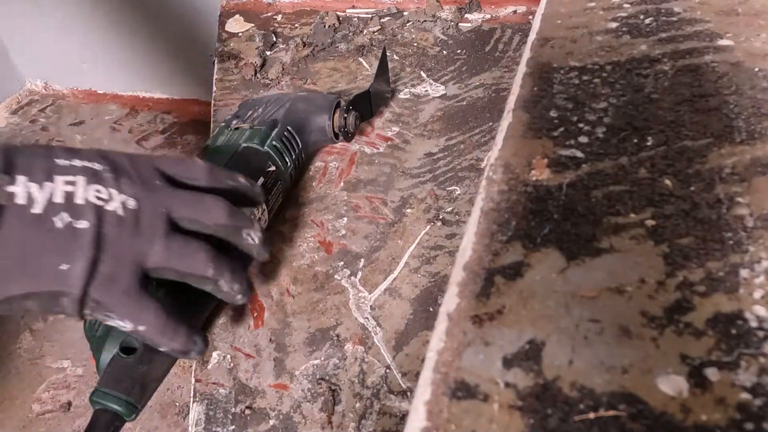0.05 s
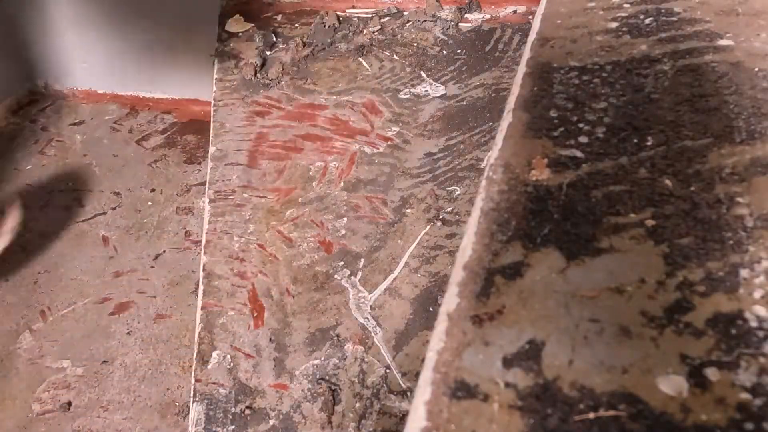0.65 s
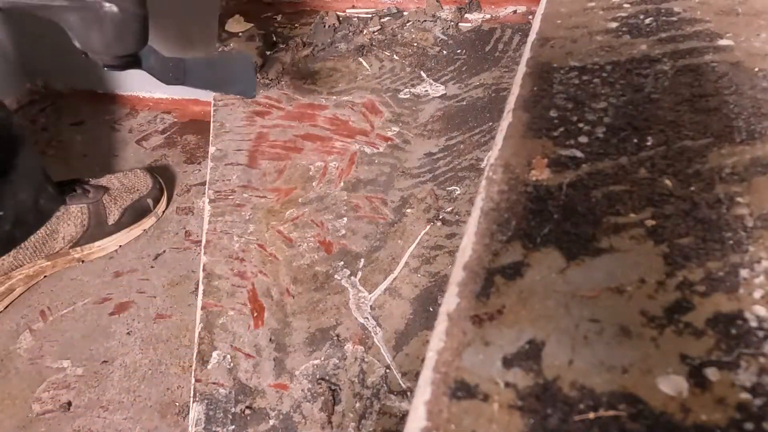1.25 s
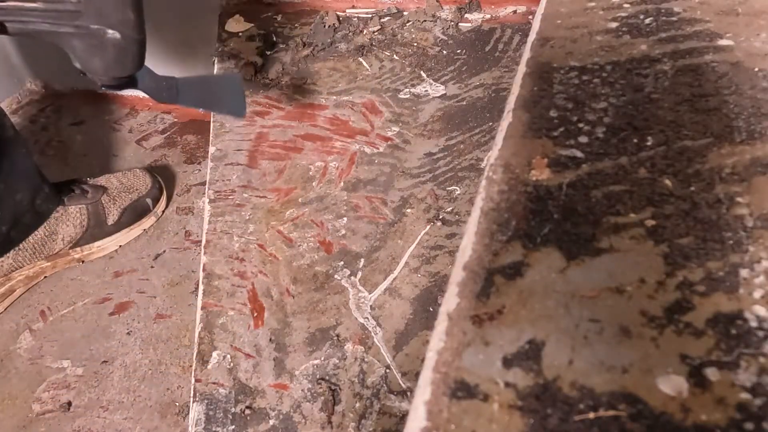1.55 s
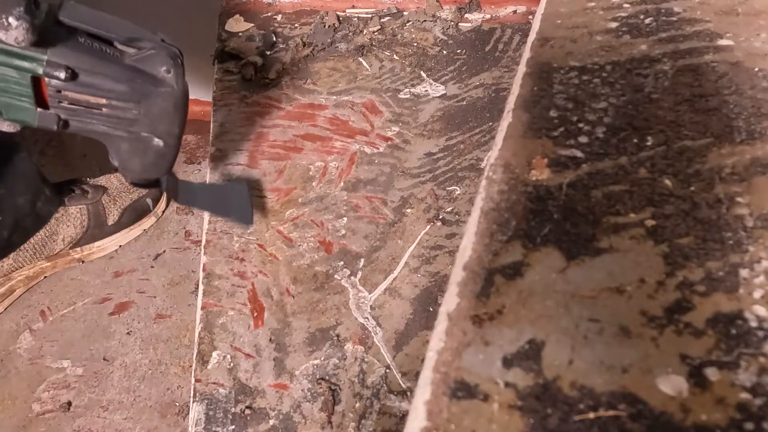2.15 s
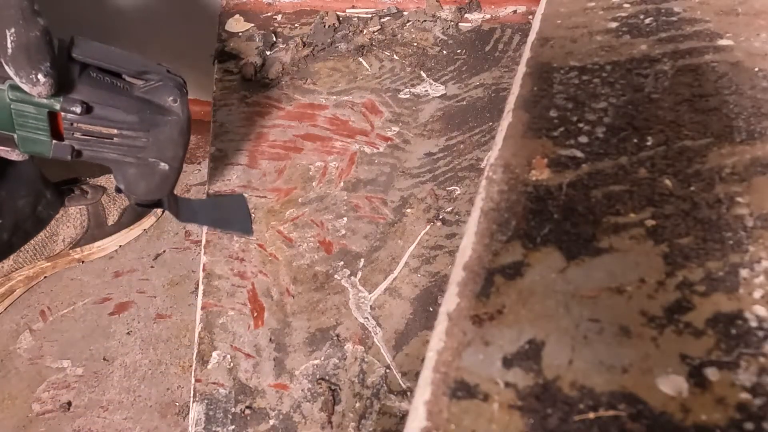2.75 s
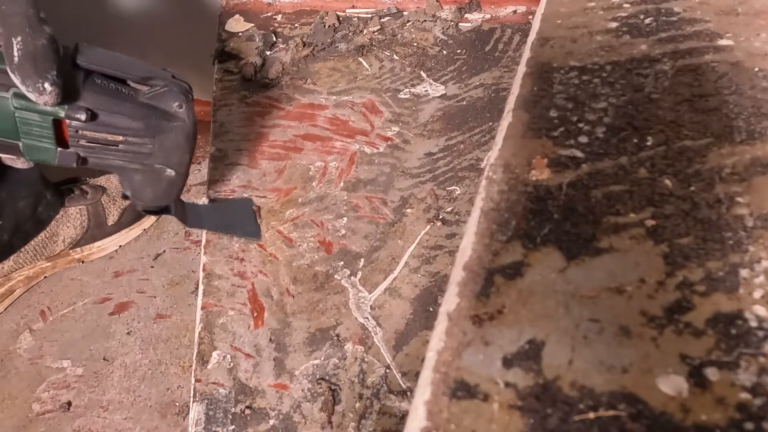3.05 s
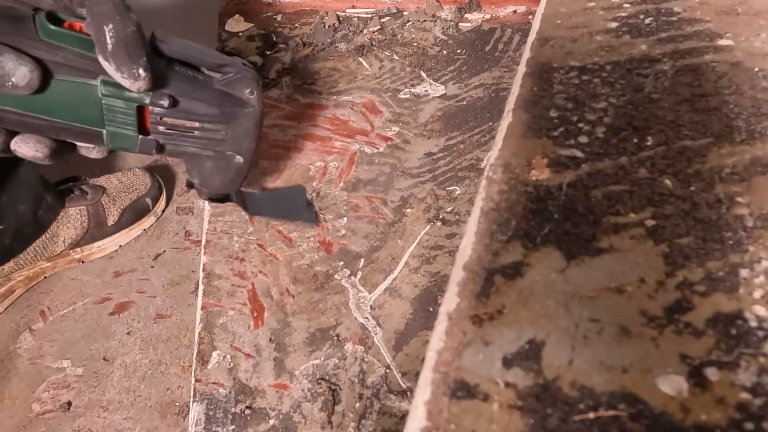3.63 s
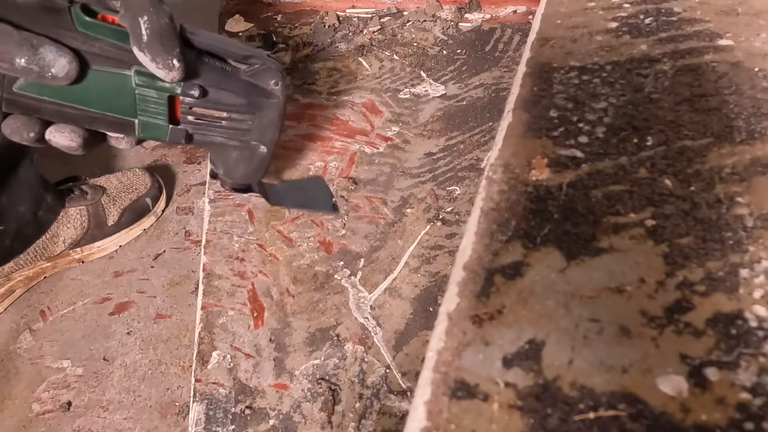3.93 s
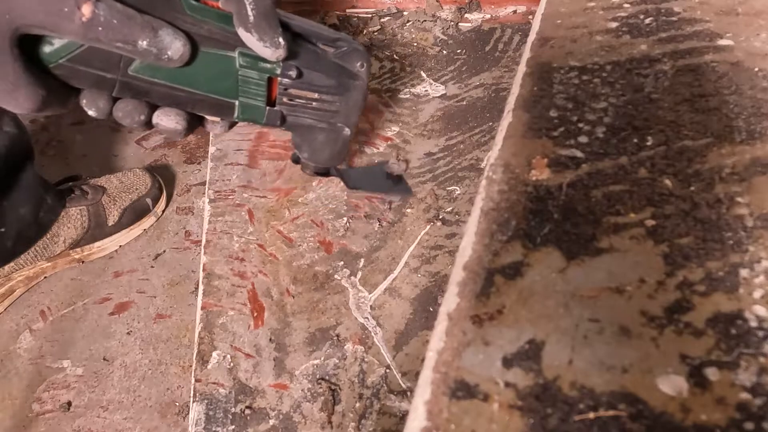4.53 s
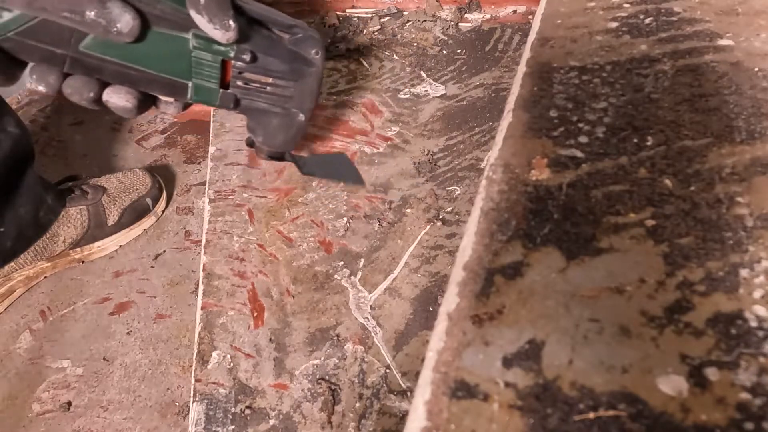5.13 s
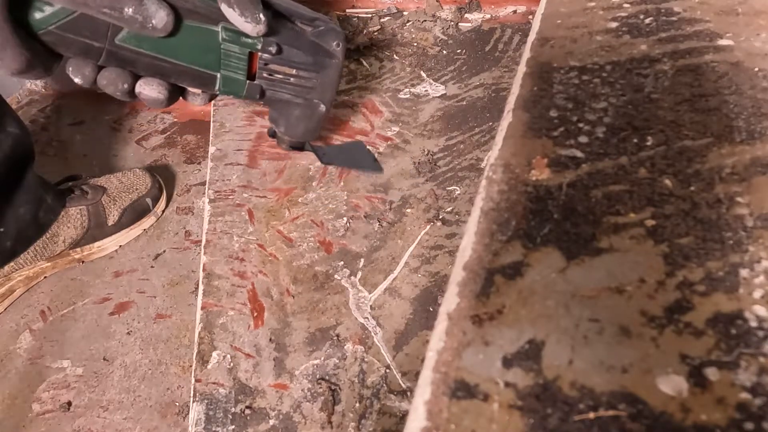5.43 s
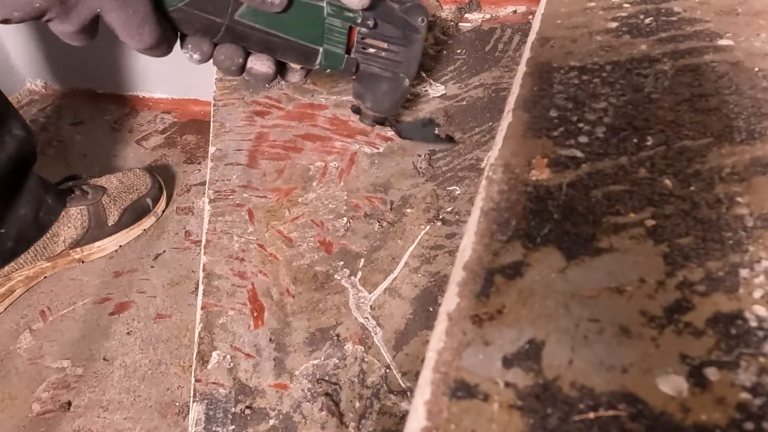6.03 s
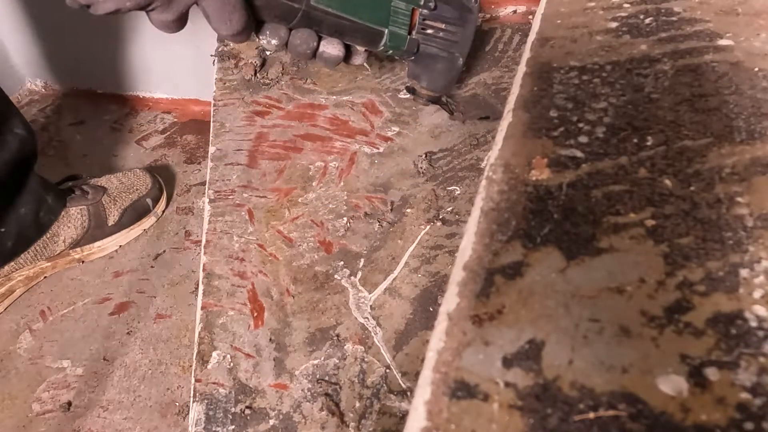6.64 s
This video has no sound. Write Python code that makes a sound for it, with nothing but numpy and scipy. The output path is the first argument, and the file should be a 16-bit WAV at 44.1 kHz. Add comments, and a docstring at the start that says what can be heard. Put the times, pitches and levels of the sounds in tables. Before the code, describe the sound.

An oscillating power tool is picked up from a concrete step with soft bumps, a glove rub and a hard, briefly ringing clack at about 0.4 seconds. Around 0.7 to 1.3 seconds a shoe shuffles with dull thuds and dry scuffs. At 1.5 seconds the switch clicks and the motor spins up, rattling loosely as it rises, then settling by about 2.5 seconds into a steady hum with a bright buzz, rushing air and a thin high whine. From about 3 seconds the blade pushes under old glue, adding a grainy rasp as the pitch dips. Brief gritty screeches come between 3.5 and 4.6 seconds. The pitch recovers around 5 seconds, then sags again, with more screeches near 5.5 and 5.9 seconds. It is lowest at the end, near 7 seconds, still running. The tool sounds close, with a short echo from hard stairwell walls.

```python
"""Scraping glue in a stairwell

An oscillating multitool is picked up from a concrete step in a hard-walled stairwell; a shoe shuffles.
The switch clicks, the motor spins up with a thin whine, and the blade is pushed under old glue,
slowing as it bites. Each swing of the blade shakes the housing (hum), rattles the drive and blade
(buzz) and rubs over grit (rasp). The walls echo."""
import sys
import numpy as np
from scipy import signal
from scipy.fft import rfft, irfft, next_fast_len
from scipy.io import wavfile

SR = 44100
rng = np.random.default_rng(int(sys.argv[2]) if len(sys.argv) > 2 else 0)


def to_wav(s):
    """Save 16-bit WAV."""
    ch = np.atleast_2d(s).T  # columns
    pcm = np.round(np.clip(ch, -1, 1) * 32767)  # PCM
    wavfile.write(sys.argv[1], SR, pcm.astype(np.int16))


N = 303408

# Table levels are relative. A "colour" says how strong each frequency is.
# colour of the still air (f/Hz, level/dB)
AIR = [(25, 12.5), (100, -11), (250, -5), (1000, -14), (4000, -20), (14000, -35)]
# knocks of hand, tool, shoe and switch (t/s, level/dB, thud dull above f/Hz, hardness/0-1)
KNOCKS = [(0.07, -42, 1110, 0.01), (0.097, -49, 980, 0.06), (0.274, -53, 4000, 0.1),
          (0.4428, -30, 4960, 0.61), (0.865, -42, 1070, 0.08), (0.928, -46, 990, 0.15),
          (1.015, -35.5, 3440, 0.12), (1.115, -40.5, 280, 0), (1.485, -35.5, 11060, 0.45)]
# colours of a soft thud and a hard clack (f/Hz, level/dB)
THUD = [(60, -8), (250, 4), (600, 9), (1000, 5), (1600, 1), (4000, 2.5), (7000, 9), (14000, -15)]
CLACK = [(100, -22), (280, -19), (430, 21), (800, -27), (1100, 11), (1350, -19), (1750, 10.5), (2400, 9.5),
         (3100, 11), (3600, 9), (4500, 10), (5500, -3), (9000, -13.5), (14000, -51)]
# notes of the knocked tool (f/Hz, level/dB, ring time/s)
TOOL_MODES = [(427, 9, 0.44), (1080, 8, 0.24), (1770, -10, .15), (2180, -5, .3), (4118, -8, 0.2),
              (7350, -16, .2), (8150, -2, 0.6)]
# how long the echo takes to fade by 60 dB (f/Hz, time/s)
ECHO_TIMES = [(100, 0.53), (500, 0.72), (2000, 0.91), (5000, 0.48), (12000, 0.61)]
# glove and shoe drags (t/s, rise/s, fade/s, rumble level/dB, scuff level/dB)
DRAGS = [(0.09, 0.017, 0.099, -61.5, -73), (0.36, 0.05, 0.4, -66.5, -69), (0.69, 0.055, 0.069, -81, -70.5),
         (0.885, 0.01, 0.14, -55, -65), (1.01, 0.023, 0.07, -68, -52.5), (1.12, .012, 0.15, -53.5, -61),
         (1.22, 0.041, 0.19, -78, -57.5)]
# colours of a drag's low rumble and dry scuff (f/Hz, level/dB)
RUMBLE = [(12, -25), (20, 4.5), (49, -16.5), (214, -11), (247, -5.5), (279, -28), (350, -17), (460, -46),
          (770, -120)]
SCUFF = [(88, -52), (150, -18), (250, -22), (418, -8.5), (443, -22), (487, -13.5), (860, -14),
         (2690, -21.5), (12500, -44), (14000, -51)]
# notes of the switch's spring (f/Hz, level/dB, ring time/s)
SPRING_MODES = [(8700, -66, .2), (11280, -57, .14), (11750, -61, .1), (12500, -61, .11)]
# swings per second that the glue allows (t/s, f/Hz)
SPEED_LIMIT = [(2.56, 328.4), (2.8, 323.3), (2.88, 318.8), (3.16, 314.4), (3.34, 317.4), (3.5, 313.9),
               (4.2, 309.1), (4.32, 309.8), (4.74, 306.0), (5.02, 323.8), (5.32, 324.5), (5.52, 315.1),
               (6.0, 311.6), (6.2, 307.3), (6.68, 290.5), (6.88, 287.9)]
# colours of the motor's rush and the blade's rasp (f/Hz, level/dB)
RUSH = [(30, -33), (90, -17.5), (180, -7.5), (400, 1), (600, -2), (1000, 3), (1350, 1.5), (2000, 5.5),
        (2900, 0), (3700, 4), (5000, -7.5), (8000, -15.5), (14000, -27)]
RASP = [(1000, -3.5), (3000, -15), (4500, 8), (6000, 4.5), (7500, 3), (8500, -4), (11000, 0.5),
        (12700, -5.5), (14500, -29)]
# shaking of the tool body (t/s, then level/dB at 1, 2 and 3 times the swing rate)
HUM = [(2.0, -43, -58.5, -53), (2.46, -36.5, -47.5, -50), (2.6, -40.5, -45.5, -56), (2.82, -35, -48.5, -63),
       (2.88, -41.5, -45.5, -68), (3.06, -37, -47, -60.5), (4.14, -41.5, -49, -59.5), (4.68, -42, -59, -55),
       (5.0, -39, -50, -49.5), (5.26, -34.5, -47, -52), (5.46, -39.5, -51, -54.5), (5.9, -40.5, -63, -55),
       (6.18, -44.5, -64, -53), (6.42, -39, -53.5, -53), (6.88, -40.5, -51.5, -58)]
# colour of the high whine (f/Hz, level/dB)
WHINE = [(8000, -16), (10000, -9), (11000, -2), (11500, 0), (11850, -7), (12400, -6), (12900, -4),
         (13300, -8), (13700, -24)]
# colour of the drive's rattle (f/Hz, level/dB)
DRIVE = [(1250, -15), (1900, -20), (2200, -15), (2500, -14), (3200, -20), (3900, -18), (4500, -11),
         (5000, -13), (6200, -15.5), (7500, -21), (10000, -33), (13000, -40)]
# the housing's resonance, shifting with grip and load (t/s, level/dB, f/Hz)
HOUSING = [(2.0, -44.5, 1630), (2.36, -51.5, 1920), (2.7, -52.5, 1890), (3.4, -53.5, 1850),
           (3.98, -51, 1560), (4.2, -42.5, 1510), (4.45, -45.5, 1460), (4.82, -45.5, 1600),
           (5.0, -47, 2260), (5.2, -49, 2200), (5.4, -45, 1700), (5.76, -43.5, 1720), (6.02, -52, 1180),
           (6.26, -53, 2120), (6.6, -50, 2070), (6.88, -66, 1160)]
# level and centre pitch of the low, middle and high overtones of the blade's buzz (t/s, level/dB, f/Hz)
BLADE_LOW = [(1.6, -58, 1500), (1.9, -47.5, 2680), (2.14, -43.5, 3120), (2.44, -49.0, 3100),
             (3.1, -48.5, 3050), (3.22, -50.5, 2870), (3.64, -51.5, 3120), (4.36, -61.5, 2970),
             (4.48, -50.5, 3000), (4.72, -56.5, 2920), (4.9, -46.0, 3170), (5.08, -45.0, 3240),
             (5.2, -59.0, 3070), (5.92, -53.0, 3010), (5.98, -52.5, 2820), (6.86, -56.5, 2680)]
BLADE_MID = [(1.62, -54, 2150), (1.73, -44, 2630), (1.79, -46, 2740), (1.86, -40.5, 3030),
             (2.04, -51.5, 3620), (2.64, -46.5, 3640), (2.76, -55.0, 3640), (3.0, -43.0, 3530),
             (3.3, -48.5, 3580), (3.66, -43.0, 3550), (3.72, -43.0, 3700), (3.96, -42.0, 3630),
             (4.2, -50.5, 3660), (4.26, -44.5, 3740), (4.8, -44.5, 3410), (4.92, -48.0, 3780),
             (5.04, -43.5, 3890), (5.1, -45.5, 3650), (5.7, -43.0, 3660), (6.0, -47.0, 3490),
             (6.06, -42.0, 3550), (6.42, -46.5, 3440), (6.54, -43.0, 3530), (6.86, -48.0, 3440)]
BLADE_HIGH = [(1.6, -54, 2250), (1.69, -44, 2550), (1.76, -51, 3080), (1.94, -52.0, 3730),
              (2.06, -57.0, 4300), (2.6, -59.5, 4520), (2.78, -52.0, 4180), (2.9, -67.5, 4300),
              (3.44, -48.5, 4160), (3.98, -50.0, 4050), (4.04, -44.0, 4030), (4.4, -53.0, 4150),
              (4.76, -40.5, 3980), (4.94, -61.0, 4450), (5.24, -62.0, 4300), (5.48, -43.5, 4140),
              (5.84, -49.0, 4150), (6.02, -40.5, 4070), (6.32, -45.0, 3960), (6.86, -41.5, 3860)]
# the blade bites through to concrete (t/s, half length/s, screech level/dB, grit level/dB)
BITES = [(1.66, .025, -70, -57), (3.52, .03, -61, -49), (3.65, .04, -62, -54), (3.89, .05, -60, -56),
         (3.925, .015, -60, -44), (4.32, .025, -59, -49), (4.62, .04, -57.5, -51), (5.46, .06, -63, -60),
         (5.86, .09, -59, -50)]
# colour of a bite's screech (f/Hz, level/dB)
SCREECH = [(2500, -31), (4700, -23), (6100, -3.5), (7500, 0.5), (8500, -26), (11000, -6), (12500, -21)]
# how alike left and right sound (f/Hz, likeness/0-1)
LIKENESS = [(60, 0.57), (250, 1), (1000, 0.9), (4000, 0.87), (8000, 0.79), (12000, 0.72)]
# how much louder the left side is (f/Hz, level/dB)
LEAN = [(500, -0.5), (4000, .5), (8000, 1), (12000, 3)]

SWITCH_S, SNAP_S, SPIN_UP_S = 1.478, 1.498, 0.226   # power on, switch snap, spin-up time constant
FREE_HZ, TIGHT_HZ = 330, 280   # swing rates: running free, and where the drive stops being loose
RUSH_DB, RASP_DB, WHINE_DB, CLAMP_DB = -45, -54, -62.5, -43   # base levels


def from_db(db):
    """Turn decibels into a gain."""
    return 10 ** (np.asarray(db) / 20)


def rms_one(x):
    """Scale to an average power of 1."""
    return x / np.sqrt(np.mean(x ** 2) + 1e-20)


def in_time(rows):
    """Turn each column of a time table into a value for every sample."""
    s, *columns = np.transpose(rows)
    return [np.interp(np.arange(N) / SR, s, c) for c in columns]


def at_hz(points, hz):
    """Look up a frequency table, sliding between its rows on a pitch scale."""
    table_hz, values = np.transpose(points)
    return np.interp(np.log(hz), np.log(table_hz), values)


def drift(rate):
    """A random wobble of size about 1 that takes a new value rate times a second."""
    knots = rng.standard_normal(8000)
    return np.interp(np.arange(N) / SR * rate, np.arange(len(knots)), knots) * np.sqrt(3 / 2)


def stereo(mid, side, hz):
    """Left and right from a shared and an opposed part; the treble leans left."""
    alike, sign = at_hz(LIKENESS, hz), np.array([[1], [-1]])
    pair = np.sqrt((1 + alike) / 2) * mid + np.sqrt((1 - alike) / 2) * side * sign
    return pair * from_db(sign * at_hz(LEAN, hz) / 2)


def noise(colour, size=N):
    """Stereo noise of a given colour, with power 1."""
    length = next_fast_len(size)
    hz = np.maximum(np.fft.rfftfreq(length, 1 / SR), 1)
    mid, side = rfft(rng.standard_normal((2, length)))
    spectrum = stereo(mid, side, hz) * from_db(at_hz(colour, hz))
    return rms_one(irfft(spectrum, length)[:, :size])


def ring(clicks, hz, ring_s):
    """Each click starts a pure tone that fades by 60 dB in ring_s."""
    decay, step = from_db(-60 / (ring_s * SR)), 2 * np.pi * hz / SR
    return signal.lfilter([0, np.sin(step)], [1, -2 * decay * np.cos(step), decay ** 2], clicks + 1e-18)


def air(level_db=-80.5):
    """The stairwell's faint, low background noise."""
    return from_db(level_db) * noise(AIR)


def knocks(fade_s=0.0071, soft_s=0.0026, size=4000):
    """Soft contacts give a rounded thud, hard ones a clack that sets the tool ringing."""
    out, clicks = np.zeros((2, N)), np.zeros(N)
    t = np.arange(size) / SR
    fade, soft_rise = np.exp(-t / fade_s), 1 - np.exp(-t / soft_s)
    for s, db, dull_hz, hard in KNOCKS:
        at = round(s * SR)
        dull = signal.butter(4, dull_hz, fs=SR, output="sos")
        thud = from_db(db - 9) * soft_rise * rms_one(signal.sosfilt(dull, noise(THUD, size)))
        clack = from_db(db - 7) * noise(CLACK, size)
        out[:, at:at + size] += fade * ((1 - hard) * thud + hard * clack)
        clicks[at] = from_db(db) * hard
    return out + sum(from_db(db - 37) * ring(clicks, hz, ring_s) for hz, db, ring_s in TOOL_MODES)


def stairwell(x, build_s=0.0035):
    """Hard walls smear a sound into an echo that lasts longest at middle pitches."""
    t, tail = np.arange(SR) / SR, 0
    edges = np.geomspace(60, 16000, 9)
    for low, high in zip(edges, edges[1:]):
        hz = np.sqrt(low * high)
        band = signal.butter(2, [low, high], "band", fs=SR, output="sos")
        mid, side = signal.sosfilt(band, rng.standard_normal((2, SR)))
        tail += stereo(mid, side, hz) * from_db(-60 * t / at_hz(ECHO_TIMES, hz))
    tail = rms_one(tail * (1 - np.exp(-t / build_s))) / np.sqrt(SR)
    return signal.fftconvolve(x.mean(axis=0, keepdims=True), tail, axes=1)[:, :N]


def drags():
    """Glove and shoe drag over dusty concrete: each drag swells quickly and dies away."""
    t, rumble, scuff = np.arange(N) / SR, 0, 0
    for s, rise_s, fade_s, rumble_db, scuff_db in DRAGS:
        shape = np.exp(-np.where(t < s, .5 * ((t - s) / rise_s) ** 2, (t - s) / fade_s))
        rumble = np.hypot(rumble, from_db(rumble_db - 2) * shape)   # hypot adds powers
        scuff = np.hypot(scuff, from_db(scuff_db - 5.5) * shape)
    grains = rms_one(from_db(0.5 * drift(500)))
    return rumble * noise(RUMBLE) + scuff * grains * noise(SCUFF)


def switch():
    """The switch snaps over and its small spring pings."""
    snap = np.zeros(N)
    snap[round(SNAP_S * SR)] = 1
    return sum(from_db(db) * ring(snap, hz, ring_s) for hz, db, ring_s in SPRING_MODES)


def motor():
    """The motor spins up until glue holds it back. Gives speed and sag (speed lost to glue) in Hz."""
    allowed, = in_time(SPEED_LIMIT)
    running_s = np.maximum(np.arange(N) / SR - SWITCH_S, .005)
    unhindered = FREE_HZ * (1 - np.exp(-running_s / SPIN_UP_S))
    return np.minimum(unhindered, allowed), FREE_HZ - allowed


def slack(speed):
    """How loose the drive is, 0-1: it tightens as the motor spins up."""
    return np.clip((TIGHT_HZ - speed) / 140, 0, 1)


def load(sag, firm_sag_hz=12.4):
    """How firmly the blade bears down, 0-1: the more speed is lost, the firmer."""
    return 1 - np.exp(-(sag / firm_sag_hz) ** 2)


def rush(speed, sag, turn, db_per_octave=2, db_per_sag_hz=-0.0927):
    """Motor and fan make a rushing noise that throbs once a swing."""
    level_db = RUSH_DB + db_per_sag_hz * sag + db_per_octave * np.log2(speed / FREE_HZ)
    throb = rms_one(1 + 0.17 * np.sin(turn))
    return from_db(level_db) * throb * noise(RUSH)


def rasp(speed, sag, turn, db_per_octave=3.5, db_per_sag_hz=-0.2122, load_db=8):
    """The blade rubs out and back over uneven grit, harder under load and in a bite."""
    level_db = RASP_DB + db_per_sag_hz * sag + db_per_octave * np.log2(speed / FREE_HZ)
    rubbing = from_db(level_db + load_db * load(sag))
    _, grit = bites()
    grains_db, patches_db = 5.5 * np.tanh(drift(600)), 2 * np.tanh(drift(23))
    strokes = rms_one((1 + 0.42 * np.cos(2 * turn)) * from_db(grains_db + patches_db))
    return np.hypot(rubbing, grit) * strokes * noise(RASP)


def hum(speed, turn, stumble_db=9, db_per_octave=4):
    """The swinging mass shakes the housing: a low tone and two overtones, stumbling until up to speed."""
    first_db, second_db, third_db = in_time(HUM)
    dips_db = stumble_db * slack(speed) ** (1 / 4) * (1 + np.tanh(2 * drift(40))) / 2
    spin_up_db = db_per_octave * np.minimum(np.log2(speed / TIGHT_HZ), 0)
    first = from_db(first_db - 1.14 + spin_up_db + 0.5 * drift(40) - dips_db) * np.sin(turn)
    second = from_db(second_db - 2.5) * np.sin(2 * turn)
    third = from_db(third_db + 3 * spin_up_db + 0.5 * drift(25)) * np.sin(3 * turn)
    lean_left = from_db([[0.5], [-0.5]])
    return np.sqrt(2) * (first + lean_left * second + third)


def whine(speed, sag, turn, order=36, mirror_hz=12000, flutter_db=2):
    """A thin whine follows the speed; a fainter whistle, mirrored about 12 kHz, glides the other way."""
    hz, phase = order * speed, order * turn + 0.6 * drift(70)
    mirrored = 2 * np.pi * 2 * mirror_hz * np.arange(N) / SR - phase
    tone = from_db(at_hz(WHINE, hz)) * np.exp(1j * phase)
    whistle = from_db(at_hz(WHINE, 2 * mirror_hz - hz)) * np.sqrt(load(sag)) * np.exp(1j * mirrored)
    both = np.sqrt(2) * (tone + whistle)
    return from_db(WHINE_DB + flutter_db * drift(32)) * stereo(both.real, both.imag, mirror_hz)


def peak(level_db, centre_hz, overtones_hz, width_hz=300):
    """Share a level among the overtones near a centre pitch."""
    near = 1 / (1 + (2 * (overtones_hz - centre_hz) / width_hz) ** 2)
    gains = near * from_db(level_db) / np.sqrt(np.sum(near ** 2, axis=0))
    return gains.astype(np.float32)


def overtone_gains(speed, orders, slack_db=-18.5, clamp_hz=3250):
    """Strength of each overtone in the housing and in the blade, whose clamp clatters at low speed."""
    overtones_hz, loose = orders[:, None] * speed, slack(speed)
    level_db, centre_hz = in_time(HOUSING)
    housing = peak(level_db - 2.5 + slack_db * loose, centre_hz, overtones_hz, width_hz=480)
    blade = loose * peak(CLAMP_DB, clamp_hz, overtones_hz)
    for curve, trim_db in ((BLADE_LOW, 0.3), (BLADE_MID, -0.1), (BLADE_HIGH, 0.2)):
        level_db, centre_hz = in_time(curve)
        blade = np.hypot(blade, peak(level_db + trim_db, centre_hz, overtones_hz))
    return housing, blade


def buzz(speed, sag, turn, hop_rate=110, waver_rate=14):
    """Drive and blade slap at every swing, making a stack of overtones that swell and fade."""
    orders = np.arange(4, 40)   # multiples of the swing rate
    housing, blade = overtone_gains(speed, orders)
    chatter = 0.25 + 0.03 * sag + 0.2 * np.sqrt(slack(speed))
    drive = from_db(RUSH_DB - 0.5 - load(sag)) * np.sqrt(speed / FREE_HZ)   # slower means fewer slaps
    screech, _ = bites()
    turn = turn + (0.015 + 0.04 * slack(speed) ** 2) * drift(300)   # slaps come a little early or late
    out = np.zeros((2, N))
    for k, in_housing, in_blade in zip(orders, housing, blade):
        usual_hz = k * speed[N // 2]
        in_drive = drive * from_db(at_hz(DRIVE, k * speed))
        in_bite = screech * from_db(at_hz(SCREECH, usual_hz))
        hopping = 0.53 * chatter * drift(hop_rate)   # a hopping blade chops and bends its own tones
        chopped = in_blade * (1 + 0.6 * np.tanh(hopping))
        gain = np.sqrt(in_drive ** 2 + in_housing ** 2 + in_bite ** 2 + chopped ** 2)
        bend = 1.6 * hopping * np.minimum(in_blade / gain, 1) * min(k / 12.5, 1.15) ** 3
        phase = k * turn + rng.uniform(0, 2 * np.pi) + 0.22 * drift(waver_rate) + bend
        swell = 1 + 0.2 * drift(waver_rate)
        out += gain * swell * stereo(np.sin(phase), np.cos(phase) * (-1) ** k, usual_hz)
    return out * np.sqrt(2)


def bites():
    """The blade reaches concrete: short swells in the gain of its screech and of the grit."""
    t, screech, grit = np.arange(N) / SR, 0, 0
    for s, half_s, screech_db, grit_db in BITES:
        swell = np.exp(-.5 * ((t - s) / half_s) ** 2)
        screech += from_db(screech_db) * swell
        grit += from_db(grit_db) * swell
    return screech, grit


def scene():
    """Handling first, heard dead centre, then the running tool, which fills the stairwell."""
    speed, sag = motor()
    turn = 2 * np.pi * np.cumsum(speed) / SR   # angle of the drive: one circle per swing
    on = np.clip((np.arange(N) / SR - SWITCH_S) / 0.03, 0, 1)
    swinging = on * np.clip(speed / 150, 0, 1) ** 2
    rattle = swinging * buzz(speed, sag, turn)
    rub = on * (rasp(speed, sag, turn) + rush(speed, sag, turn))
    hits = knocks() + switch()
    # the buzz is kept mostly dry so its tones stay clear; rasp and rush echo more
    echo = stairwell(from_db(-10) * rattle + from_db(-3.5) * rub)
    tool = swinging * (hum(speed, turn) + whine(speed, sag, turn)) + rattle + from_db(-1) * rub
    centre = hits + from_db(-5) * stairwell(hits) + (1 - on) * drags() + air()
    return tool + echo + centre.mean(axis=0)


def record(dry, cutoff_hz=14900):
    """The highest treble is cut off steeply."""
    return signal.sosfilt(signal.ellip(10, .1, 80, cutoff_hz, fs=SR, output="sos"), dry)


dry = scene()
out = record(dry)
to_wav(out)
```